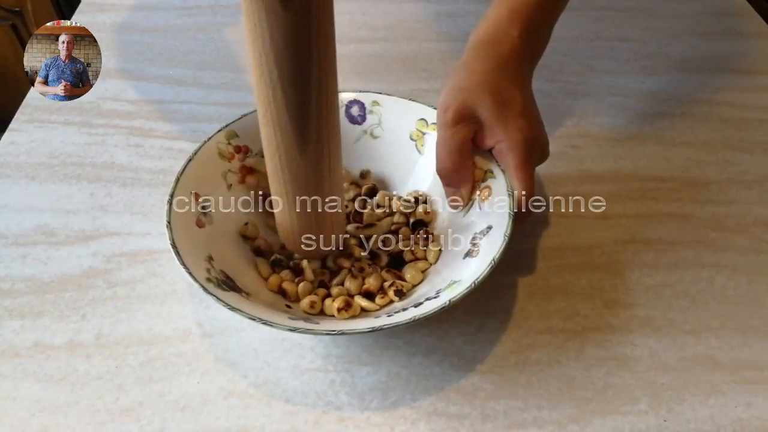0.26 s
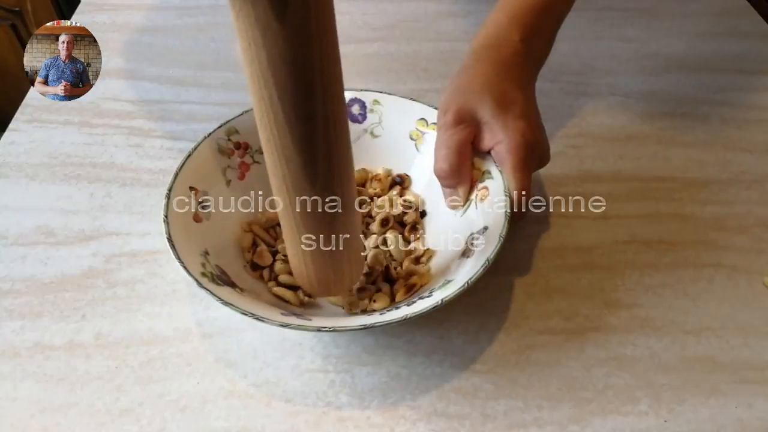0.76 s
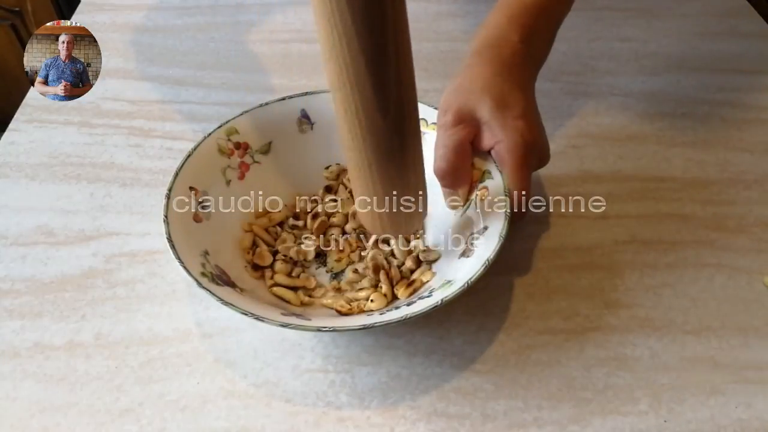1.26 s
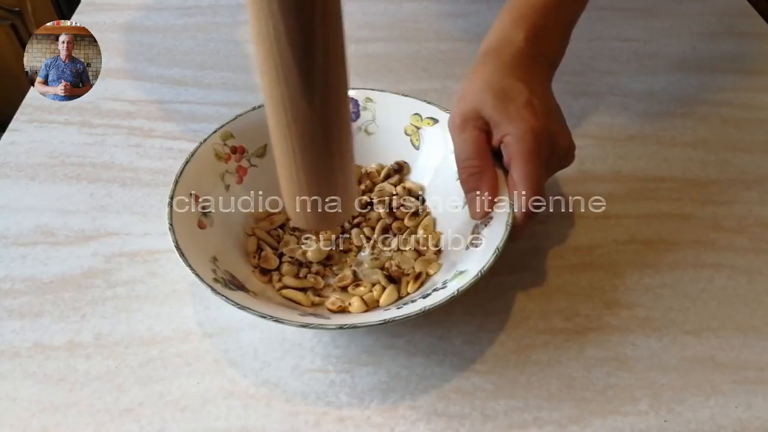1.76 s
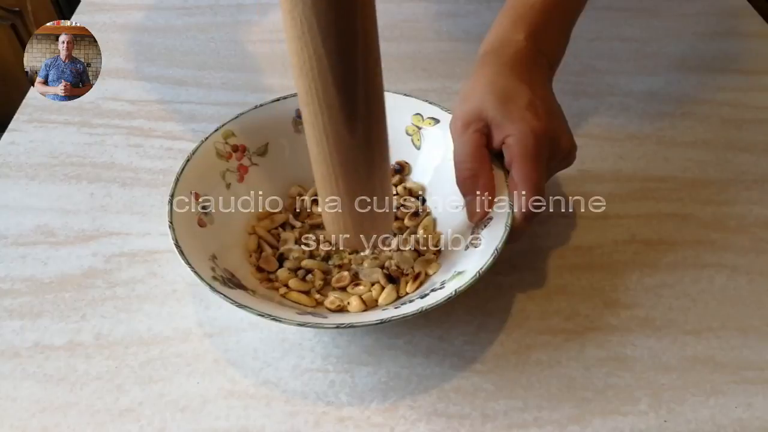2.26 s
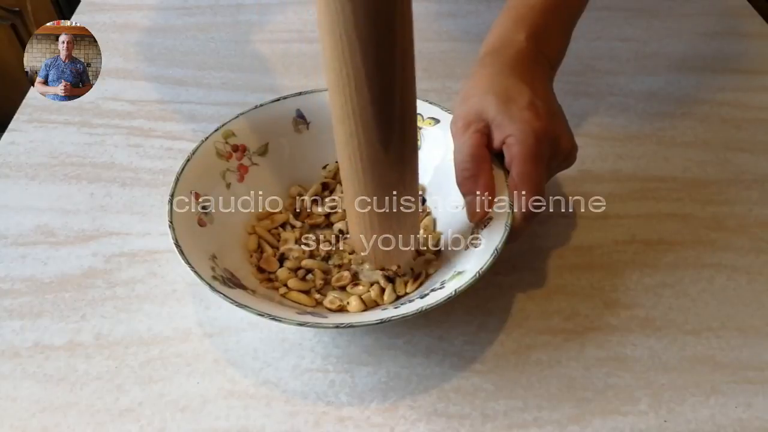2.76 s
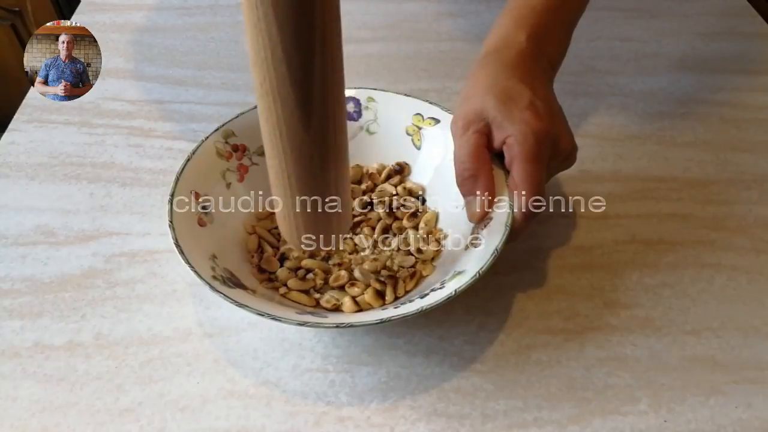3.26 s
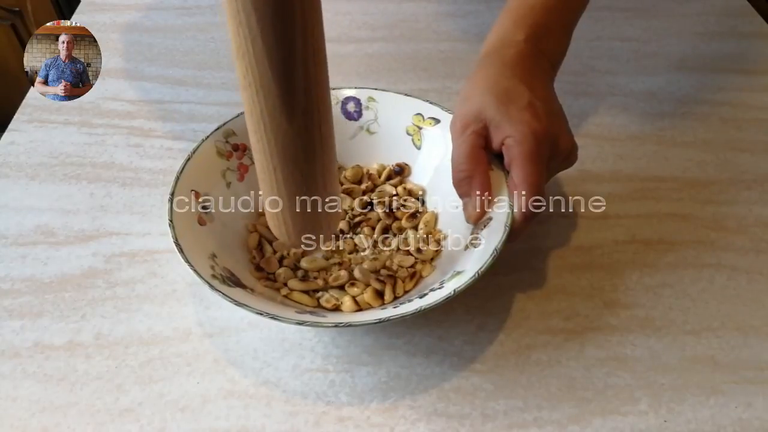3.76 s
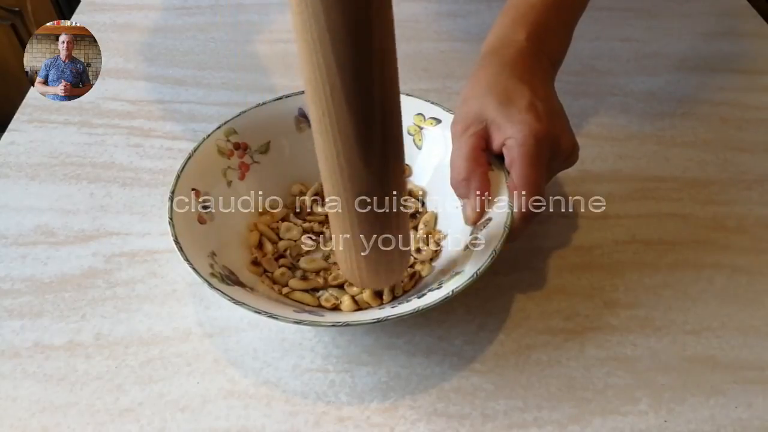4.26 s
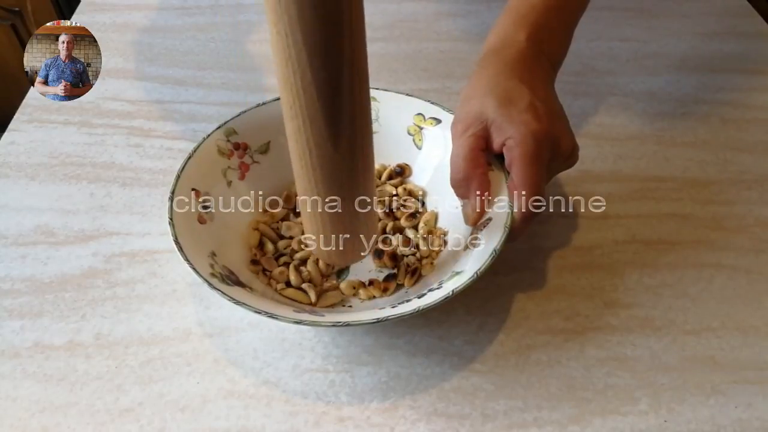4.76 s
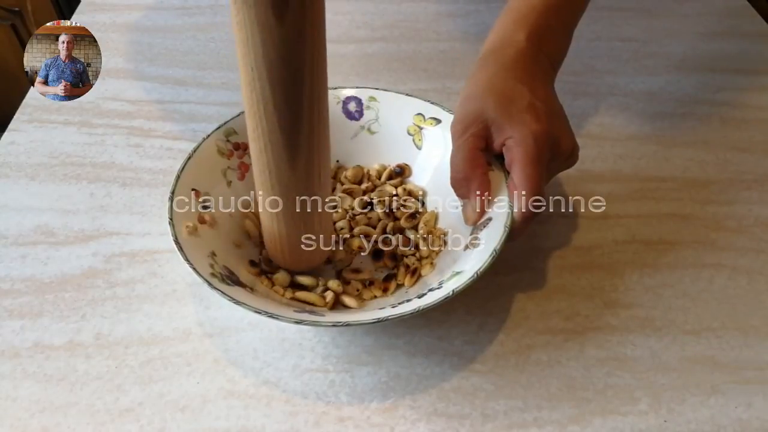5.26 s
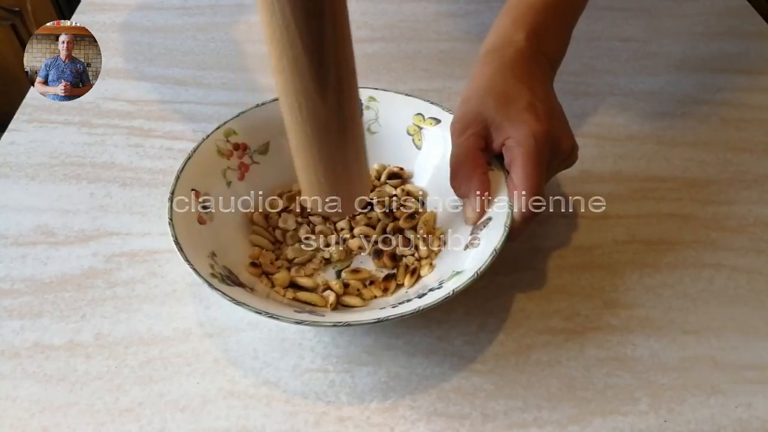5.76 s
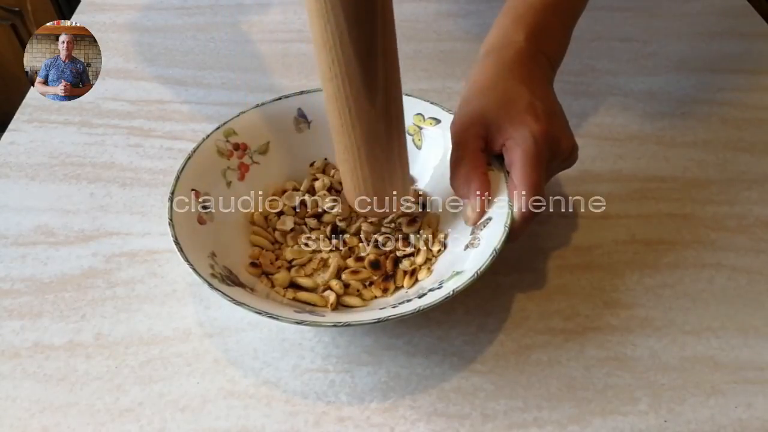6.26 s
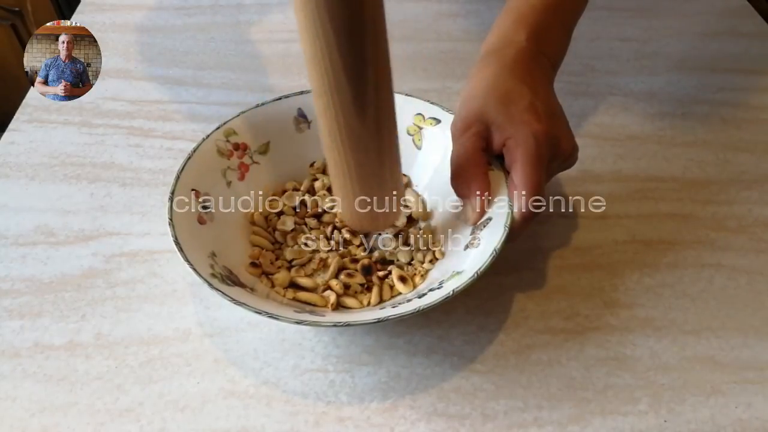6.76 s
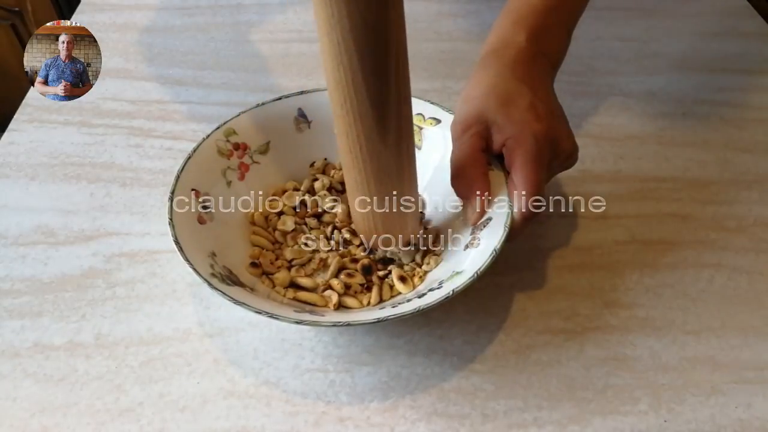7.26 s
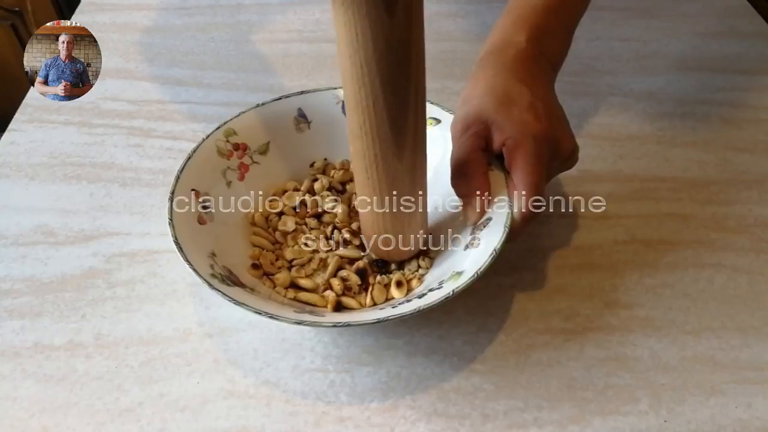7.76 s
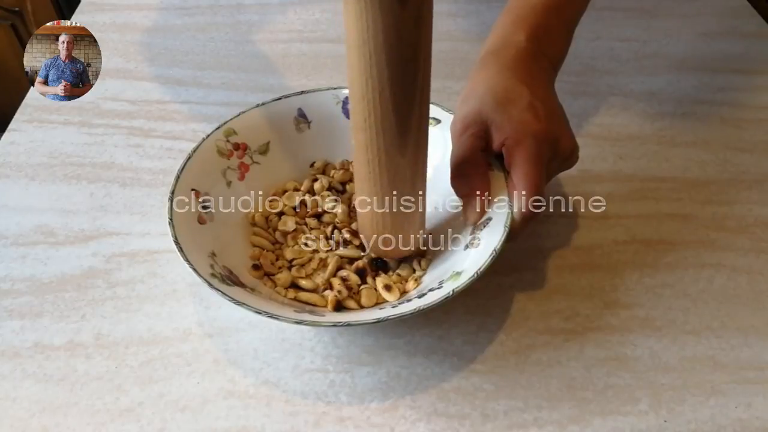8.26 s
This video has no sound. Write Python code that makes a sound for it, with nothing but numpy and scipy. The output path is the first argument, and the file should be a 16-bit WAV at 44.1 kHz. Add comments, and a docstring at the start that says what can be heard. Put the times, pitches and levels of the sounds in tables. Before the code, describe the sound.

A wooden pestle pounds toasted nuts in a ceramic bowl throughout, about twenty uneven strokes in under nine seconds. Each combines a dry crack, a hollow knock, a damped ceramic ring and a low table thump. In the first second the strokes are crunchy, with loose pieces sliding and pattering against the bowl. A bright, ringing crunch comes at 2 seconds. The hardest knocks land at about 3.4, 3.9 and 5.5 seconds. Pieces tumble and clink lightly around 4.4 seconds and again during softer strokes between 6 and 6.6 seconds. The pestle drags very faintly on the glaze near 3.7 and 7.3 seconds. Firmer blows return from 7 seconds, ending with a heavy thump at 8.5. The sound is close and slightly left, with the short echo of a small kitchen and a faint appliance hum underneath.

```python
"""A small, hard-walled kitchen, with a stereo microphone at the table and the bowl a little to its left.
A wooden pestle pounds toasted nuts in the hand-held ceramic bowl. In each stroke the nuts crack,
the table thumps, and the pestle, once through, knocks on the bowl. Loose pieces slide, tumble and tap
the wall into a short ring; twice the pestle drags on the glaze. The room answers the strokes,
and under them lie still air and the low hum of an appliance."""
import sys
import numpy as np
from scipy import signal
from scipy.fft import rfft, irfft, next_fast_len
from scipy.io import wavfile

SR = 44100
rng = np.random.default_rng(int(sys.argv[2]) if len(sys.argv) > 2 else 0)


def store_pcm(level_fs):
    """Save levels as 16-bit WAV."""
    pcm = np.round(np.clip(level_fs, -1, 1) * 32767).astype(np.int16)
    wavfile.write(sys.argv[1], SR, np.atleast_2d(pcm).T)


N = 375732
T = np.arange(SR * 3 // 4) / SR  # time within one sound
LEAD_S = .03  # build-up before the peak of a thump or crunch

# pestle strokes: (time of the stop [s], thump [dB], knock [dB], cracking [dB], bowl ring [dB],
# time the nuts take to give way [s])
STROKES = [(0.181, -21.5, -42.5, -34, -23.5, .0036), (.468, -27.5, -32.5, -34.5, -26.5, .0056),
           (.695, -39, -53, -39.5, -37, .012), (0.969, -27.5, -25, -25.5, -27.5, 0.0021),
           (1.4691, -23.5, -21.5, -39, -40, .0031), (2.025, -37.5, -45, -29.5, -20.5, 0.0045),
           (2.408, -22, -27, -51, -48, .0045), (2.829, -19.5, -23.5, -42, -37, 0.0049),
           (3.415, -26, -15.5, -37, -34.5, 0.0036), (3.9045, -23, -14.5, -33.5, -35, 0.0024),
           (4.345, -32.5, -35, -29.5, -34, .0135), (5.165, -32, -26.5, -32.5, -39, .003),
           (5.212, -47, -39, -57.5, -56, 0.0022), (5.534, -26.5, -13.5, -34.5, -30, .0018),
           (6.064, -36, -62, -38.5, -36, 0.015), (6.517, -33, -45.5, -39.5, -31, 0.0099),
           (7.092, -21, -33.5, -34, -27, .0025), (7.482, -33, -24, -43, -39.5, 0.012),
           (7.764, -25.5, -27.5, -33.5, -26, .0021), (8.159, -26, -22, -35.5, -38.5, .0023),
           (8.502, -18.5, -22, -38.5, -40, .005)]
# loose nuts shift under the pestle: (start [s], end [s], level [dB])
SLIDES = [(-.02, 0.02, -45), (0.175, 0.344, -57.5), (0.494, 0.573, -57.5), (0.704, 0.95, -59.5),
          (3.563, 3.636, -61), (4.306, 4.331, -49), (4.395, 4.645, -66.5), (6.097, 6.137, -63)]
# displaced pieces tumble against the wall: (start [s], end [s], level [dB])
TUMBLES = [(.2, .41, -52), (.49, .645, -53), (.665, .78, -45), (4.36, 4.43, -50.5), (6.08, 6.17, -50.5),
           (6.54, 6.63, -53)]
# light taps; smaller pieces shake only higher modes: (time [s], level [dB], lowest mode shaken [Hz])
CLINKS = [(.5657, -45.5, 1400), (.8241, -51, 4600), (3.5844, -55, 2400), (4.3142, -39, 1900),
          (4.4369, -41, 1400), (4.5437, -44.5, 1440), (5.2645, -54, 2400), (5.3354, -58, 6500),
          (6.1979, -35, 3600), (7.5294, -45, 1410)]
# the pestle drags on the glaze: (start [s], end [s], pitch [Hz], level [dB])
DRAGS = [(3.674, 3.866, 1369, -61.5), (7.271, 7.47, 1399, -59)]

# resonances: (frequency [Hz], level [dB], t60 [s])
BOWL_MODES = [(1321, -2.5, 0.035), (2353, -4, 0.022), (3480, -3.5, 0.019), (3631, 3, .038),
              (4960, -8.5, 0.013), (6010, -3.5, .03), (6140, -10, .025), (7020, -5.5, 0.079),
              (9135, -18, .012), (10100, -19, 0.013)]  # bowl wall, damped by the hand
DEEP_MODES = [(44, -16, 0.9), (88, -16, .19), (122, -13, 0.47), (166, -9.5, 0.62), (201, -19.5, 0.75)]  # table and kitchen
WOOD_MODES = [(242, -5, 0.042), (279.9, 2, 0.078), (388, 1.5, .07), (472.6, -2.5, 0.05), (513, 1, 0.038),
              (597, -.5, .044)]  # table top and pestle shaft
KNOCK_MODES = [(753.5, -3, 0.019), (894.5, -1.5, 0.031), (1048, -7, .016), (1263, -4.5, 0.04),
               (1476, -8, 0.017), (1749, -5, .012), (1995, -3.5, 0.009), (2312, -5, 0.0092),
               (2700, -12, .01), (3190, -14.5, .009)]  # pestle against the loaded bowl

# spectra: (frequency [Hz], level [dB])
AIR_SPECTRUM = [(25, -28.5), (65, -19), (100, -19.5), (160, -23.5), (330, -20.5), (600, -22.5),
                (1200, -22.5), (4250, -24.5), (16000, -35)]  # still air in the room
LOOSE_SPECTRUM = [(40, -32), (200, -8), (900, 5), (1600, 3), (3000, -0.5), (5000, 1), (7000, -1),
                  (10000, -9.5), (16000, -17.5)]  # loose pieces touching
CRACK_SPECTRUM = [(40, -32.5), (200, -15.5), (700, 1), (1500, 0.5), (2600, 4), (3300, 5), (4500, 2),
                  (6300, 3), (8500, -1.5), (12000, -4), (16000, -7)]  # a nut breaking
CRUMB_SPECTRUM = [(40, -43), (200, -19), (450, -11), (800, -1), (1100, -2.5), (1700, -8), (2300, -14.5),
                  (3200, -14.5), (4500, -22.5), (7000, -37.5), (16000, -61)]  # packed crumbs grinding
TAP_SPECTRUM = [(2340, -2.5), (3600, -1), (6000, -9.5)]  # force of a light tap
REVERB_SPECTRUM = [(100, -2.5), (300, 1), (850, 3), (1600, -2), (3500, -8.5), (7000, -6.5), (14000, -3.5)]  # what the walls send back

# a cushioned stop pushes the table more slowly: (knock level [dB], pitch of the push [Hz])
PUSH_PITCH = [(-52, 100.3), (-25, 112), (-14.5, 160)]
# the thump off ceiling and walls: (delay [s], gain [ratio])
THUMP_ECHOES = [(0.0162, 0.96), (.0362, .22), (.0415, .4)]
# nearest surfaces: (delay to the left microphone [s], delay to the right [s], gain [ratio])
NEAR_ECHOES = [(.0112, .0114, .2), (.0131, .0128, .15), (.0478, .0482, .12)]
# decay of the kitchen: (frequency [Hz], t60 [s])
ROOM_DECAY = [(150, 0.65), (400, 0.3), (900, 0.38), (2000, 0.29), (6000, .4), (14000, .29)]
# diffuse sound at the microphone: (frequency [Hz], left-right likeness [ratio])
COHERENCE = [(100, 0.92), (200, 0.7), (450, 0.15), (900, 0.016), (3000, 0.1)]
# shading of the direct sound on the far side: (frequency [Hz], right against left [dB])
MIC_SHADE = [(700, -9), (1500, 0), (3000, -12), (8000, -11), (13000, -8.5)]


def amp(db):
    """Decibels to gain."""
    return 10 ** (np.asarray(db) / 20)


def unit(x):
    """Scale to rms 1."""
    return x / np.sqrt(np.mean(x ** 2) + 1e-20)


def along(points, hz):
    """Read (Hz, value) points on a log axis."""
    freqs, values = np.transpose(points)
    return np.interp(np.log(hz + 1), np.log(freqs + 1), values)


def filtered(x, response):
    """Pass x through a frequency response."""
    n = x.shape[-1]
    padded = next_fast_len(n + 2048)
    return irfft(rfft(x, padded) * response(np.fft.rfftfreq(padded, 1 / SR)), padded)[..., :n]


def burst(x, db):
    """Give a short sound the energy of 10 ms at this level."""
    return amp(db) * x / np.sqrt(np.sum(x ** 2) / (SR / 100) + 1e-20)


def add(track, s, sound):
    """Mix a sound into the track from time s."""
    i = max(round(s * SR), 0)
    part = sound[..., :max(N - i, 0)]
    track[:, i:i + part.shape[-1]] += part


def impulses(size, per_s, spread_db):
    """Tiny fractures or slips at random moments, some stronger than the rest."""
    chance, sign, strength = rng.random(size), rng.choice([-1, 1], size), rng.standard_normal(size)
    return (chance < per_s / SR) * sign * amp(spread_db * np.minimum(strength, 2))


def ring(modes, force, scatter_db, colour=lambda hz: 0, detune=0):
    """Damped modes shaken by a force, at new strengths and slightly new pitches each time."""
    hz, db, t60 = np.transpose(modes)
    t = T[:SR // 12]
    gains = amp(db + colour(hz) + scatter_db * rng.standard_normal(len(hz))) * (-1) ** np.arange(len(hz))
    hz = hz * (1 + detune * rng.standard_normal(len(hz)))
    waves = np.sin(2 * np.pi * hz[:, None] * t) * np.exp(-np.log(1000) * t / t60[:, None])
    waves = signal.fftconvolve(waves, force[None], axes=1)
    sound = gains @ (waves / np.linalg.norm(waves, axis=1, keepdims=True))
    return np.pad(sound, (0, len(T)))[:len(T)]


def diffuse(pair, spectrum):
    """Sound from all round the microphone: two noises, coloured and made alike in the bass."""
    def response(hz):
        angle = np.arccos(np.clip(along(COHERENCE, hz), -1, 1)) / 2
        return amp(along(spectrum, hz)) * np.array([np.cos(angle), np.sin(angle)])
    mid, side = filtered(pair, response)
    return np.array([mid + side, mid - side])


def kitchen(x, wet_db, build_s=.01, right_lag_s=.0001):
    """Sound reaches the microphone directly from the left, then off near surfaces and from all round."""
    def direct_path(hz):
        shade = amp(along(MIC_SHADE, hz) * hz / (hz + 300))  # long waves bend round the microphone
        return np.array([np.ones_like(hz), shade * np.exp(-2j * np.pi * hz * right_lag_s)])
    hz, t, noise = signal.stft(rng.standard_normal((2, SR // 2)), SR, nperseg=256)
    decay = np.exp(-np.log(1000) * t / along(ROOM_DECAY, hz)[:, None])
    tail = signal.istft(noise * decay, SR, nperseg=256)[1]
    tail *= 1 - np.exp(-(T[:tail.shape[1]] / build_s) ** 2)
    tail = diffuse(tail / np.linalg.norm(tail[0]), REVERB_SPECTRUM)
    for left, right, gain in NEAR_ECHOES:
        tail[0, round(left * SR)] += gain
        tail[1, round(right * SR)] += gain
    reverb = signal.fftconvolve(x[None], tail, axes=1)[:, :len(x)]
    return filtered(x, direct_path) + amp(wet_db) * reverb


def room_tone(air_db=-67, hum_db=-75, hum_hz=101.5):
    """Still air all round the microphone and the low hum of an appliance."""
    air = unit(diffuse(rng.standard_normal((2, N)), AIR_SPECTRUM))
    hum = np.sqrt(2) * np.sin(2 * np.pi * hum_hz * np.arange(N) / SR)
    return amp(air_db) * air + amp(hum_db) * hum


def rustle(rise_s=.0067, fade_db_per_s=15, settle_s=.025):
    """Loose nuts slide over each other, slow down and settle, heard mostly off the walls."""
    t, motion = np.arange(N) / SR, np.zeros(N)
    for start, end, db in SLIDES:
        age = np.maximum(t - start, 0)
        settling = np.exp(-np.maximum(t - end, 0) / settle_s)
        motion += amp(db - fade_db_per_s * age) * np.minimum(age / rise_s, 1) * settling
    grains = filtered(impulses(N, per_s=900, spread_db=2.5), lambda hz: amp(along(LOOSE_SPECTRUM, hz)))
    return kitchen(unit(grains) * motion, wet_db=6)


def crunches(crack_db=2.5, ring_db=-1, lead_db=-23, touch_s=.0086, brittle_s=.001, nuts=3):
    """Fractures pile up as the load grows and stop as each nut collapses; each one shakes the bowl."""
    track, t = np.zeros((2, N)), T - LEAD_S
    crack_colour = lambda hz: amp(along(CRACK_SPECTRUM, hz) + along([(5500, 0), (11000, -3.5)], hz))
    chime_colour = lambda hz: along(
        [(2300, -14), (3400, 6.5), (3800, 0), (4900, -14), (6100, -2), (7100, -15)], hz)
    for s, _, _, db, bowl_db, collapse_s in STROKES:
        break_s = s - .27 * collapse_s  # the nuts break just before the pestle stops
        load = np.exp(-np.abs(t) / (collapse_s * np.where(t < 0, 1, .86))) + amp(lead_db) * (t < 0)
        touching = t > -max(touch_s, 1.5 * collapse_s)
        # a quick collapse ends in one clean break
        split = (brittle_s / collapse_s) * np.exp(-(t / .0006) ** 2)
        for _ in range(nuts):
            snaps = impulses(len(T), per_s=5000, spread_db=1.5) * (load + 2 * split) * touching
            cracking = filtered(snaps, crack_colour)
            force = (snaps * load)[:SR // 12]
            chime = ring(BOWL_MODES, force, scatter_db=2, colour=chime_colour, detune=.002)
            nut = burst(cracking, db + crack_db) + burst(chime, bowl_db + ring_db)
            add(track, break_s - LEAD_S, kitchen(nut, wet_db=-3.5) / np.sqrt(nuts))
    return track


def thumps(gain_db=1, swell_s=.01, low_cut_hz=95):
    """The table dips and springs back; walls return the push and the deep modes hang on."""
    track, t = np.zeros((2, N)), T - LEAD_S
    age = np.maximum(t, 0)
    swell = 1 - np.exp(-age / swell_s)
    for s, db, knock_db, *_ in STROKES:
        push_hz = np.interp(knock_db, *np.transpose(PUSH_PITCH))
        push = lambda t: (1 - 2 * (np.pi * push_hz * t) ** 2) * np.exp(-(np.pi * push_hz * t) ** 2)
        echoes = sum(gain * push(t - delay) for delay, gain in THUMP_ECHOES)
        boom = np.zeros(len(T))
        for hz, mode_db, t60 in DEEP_MODES:
            uptake = (hz / push_hz) ** 2 * np.exp(1 - (hz / push_hz) ** 2)  # greatest at the push pitch
            wave = np.cos(2 * np.pi * hz * age) * np.exp(-np.log(1000) * age / t60)
            boom += uptake * amp(mode_db + rng.normal(0, 1)) * wave
        add(track, s - LEAD_S, burst(push(t) + echoes + boom * swell, db + gain_db))
    # a table top radiates little at the lowest frequencies
    return filtered(track, lambda hz: 1j * hz / (1j * hz + low_cut_hz))


def knocks(gain_db=-2, bare_glaze_db=-21.5, chatter_s=.0039, grind_db=-2, grind_s=.0099):
    """The pestle comes to a stop: the wood answers dully, the loaded bowl with a hollow knock."""
    track, t = np.zeros((2, N)), T[:SR // 100]
    for s, thump_db, db, crack_db, *_ in STROKES:
        contact = (t == 0) + .1 * rng.standard_normal(len(t)) * np.exp(-t / chatter_s)
        # the wood tone grows with the blow, then falls away once the tip meets bare glaze
        wood_db = -9.5 + .3 * thump_db + .43 * min(db, bare_glaze_db) - 2.3 * max(db - bare_glaze_db, 0)
        wood = ring(WOOD_MODES, contact, scatter_db=5, detune=.031)
        add(track, s - .001, kitchen(burst(wood, wood_db), wet_db=-2.5))
        # the thinner the cushion of nuts, the harder the contact and the stronger the upper modes
        bright_db = -8.5 + .34 * np.clip(db - crack_db, 0, 19)
        hardness = lambda hz: along([(900, .0008), (1600, bright_db + 1), (3000, .92 * bright_db + 1)], hz)
        level = db + gain_db + 10 * np.log10(1 + amp(bright_db) ** 2)
        knock = ring(KNOCK_MODES, contact, scatter_db=1.2, colour=hardness, detune=.03)
        # packed crumbs grind under the tip just after the blow
        crumb_colour = lambda hz: amp(along(CRUMB_SPECTRUM, hz) + hardness(hz))
        crumbs = filtered(rng.standard_normal(len(T)), crumb_colour)
        grind = crumbs * np.exp(-T / grind_s) * (1 - np.exp(-T / .0014))
        add(track, s, kitchen(burst(knock, level) + burst(grind, level + grind_db), wet_db=-3.5))
    return track


def tumbles(per_s=65, fade_db=6, gain_db=-3, tick_db=-1):
    """Pieces pushed up the wall fall back in a patter of dry ticks and tiny rings."""
    track = np.zeros((2, N))
    wall_colour = lambda hz: along([(3600, 26.5), (6000, -23.5)], hz)
    tick_colour = lambda hz: amp(along(LOOSE_SPECTRUM, hz)) / np.hypot(1, hz / 5000)
    for start, end, db in TUMBLES:
        count = round((end - start) * per_s)
        taps = np.zeros(len(T) // 2)
        landings = ((np.arange(count) + rng.random(count)) / per_s * SR).astype(int)
        taps[landings] = amp(3.3 * rng.standard_normal(count) - np.linspace(0, fade_db, count))
        wall = ring(BOWL_MODES, taps, scatter_db=9.5, colour=wall_colour, detune=.0047)
        tick = filtered(rng.standard_normal(len(T)), tick_colour) * np.exp(-T / .0015)
        ticks = signal.fftconvolve(taps, tick)[:len(T)]
        level = db + 10 * np.log10(count) + gain_db
        add(track, start, kitchen(burst(wall, level) + burst(ticks, level + tick_db), wet_db=-8.5))
    return track


def clinks(ring_db=5, tick_db=-16, cut_db_per_oct=38):
    """A piece of nut or the side of the pestle taps the bowl wall into a short ring."""
    track = np.zeros((2, N))
    for s, db, lowest_hz in CLINKS:
        low_cut = lambda hz: cut_db_per_oct * np.maximum(np.log2(lowest_hz / hz), 0)
        colour = lambda hz: along(TAP_SPECTRUM, hz) - low_cut(hz)
        wall = ring(BOWL_MODES, np.ones(1), scatter_db=2.5, colour=colour, detune=.003)
        contact = rng.standard_normal(len(T)) * np.exp(-T / .0018)
        tick = filtered(contact, lambda hz: amp(along(LOOSE_SPECTRUM, hz)))
        add(track, s, kitchen(burst(wall, db + ring_db) + burst(tick, db + tick_db), wet_db=-5))
    return track


def drags(width_hz=85, upper_ratio=1.28, upper_db=-9, touch_db=15):
    """Wood touches the glaze, then its small slips sing faintly in two narrow resonances."""
    track = np.zeros((2, N))
    mode = lambda hz, centre: 1 / (1 + 1j * (hz - centre) / width_hz) ** 2
    for start, end, pitch, db in DRAGS:
        size = round((end - start) * SR)
        slips = impulses(size, per_s=600, spread_db=5) * np.sqrt(np.linspace(0, 1, size))
        slips[0] = amp(touch_db)
        song = filtered(slips, lambda hz: mode(hz, pitch) + amp(upper_db) * mode(hz, upper_ratio * pitch))
        add(track, start, kitchen(np.pad(amp(db) * unit(song), (0, len(T))), wet_db=-3))
    return track


def scene():
    """Everything that reaches the microphone at the table."""
    return room_tone() + rustle() + crunches() + thumps() + knocks() + tumbles() + clinks() + drags()


def record(dry, right_cut_hz=9000, top_hz=16000):
    """The microphone is a little duller on the right and passes nothing above its band limit."""
    sides = lambda hz: np.array([np.ones_like(hz), 1 / np.hypot(1, hz / right_cut_hz)])
    return filtered(dry, lambda hz: sides(hz) * (hz < top_hz))


dry = scene()
out = record(dry)
store_pcm(out)
```